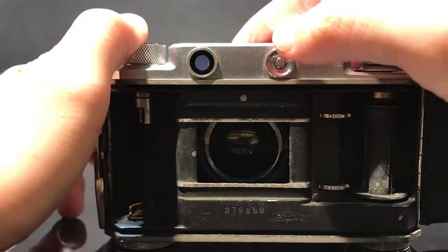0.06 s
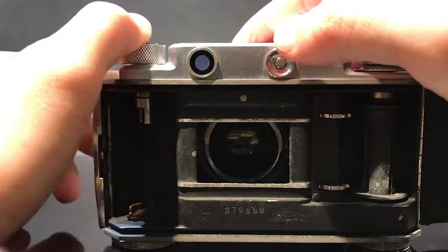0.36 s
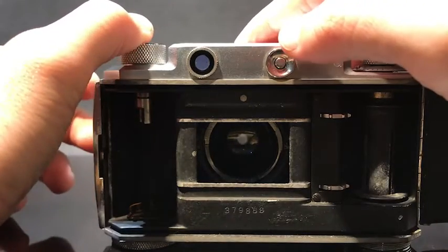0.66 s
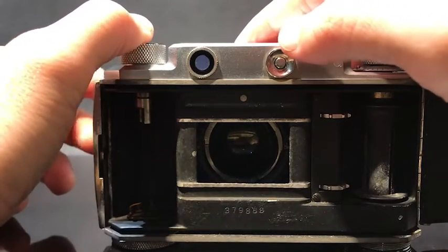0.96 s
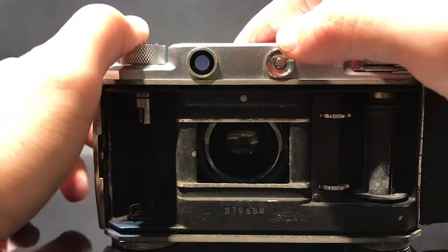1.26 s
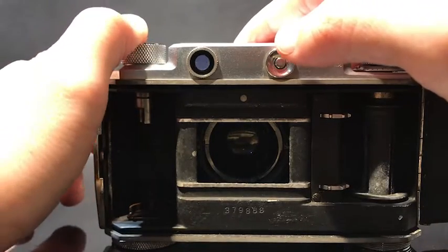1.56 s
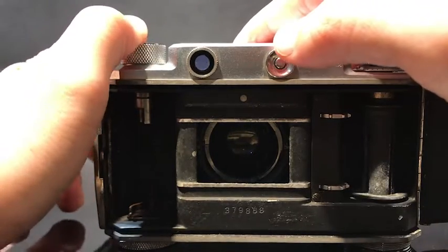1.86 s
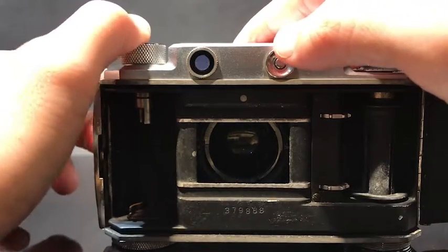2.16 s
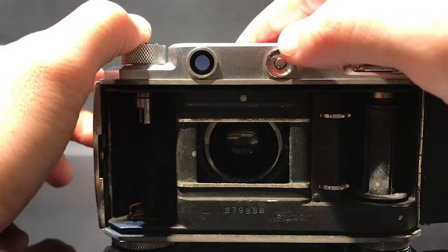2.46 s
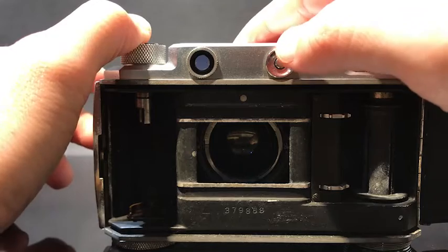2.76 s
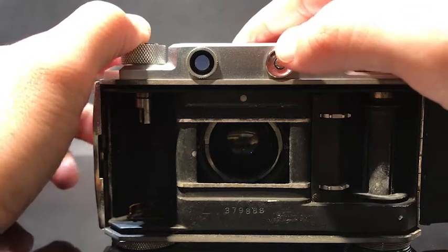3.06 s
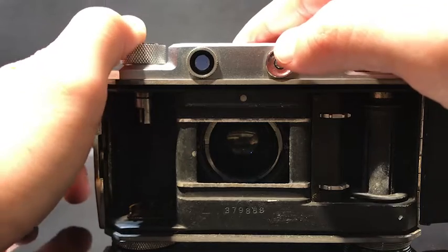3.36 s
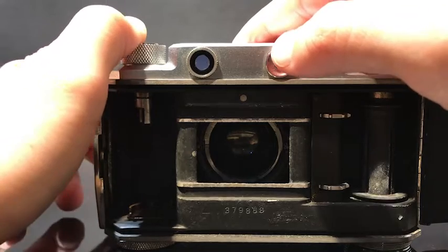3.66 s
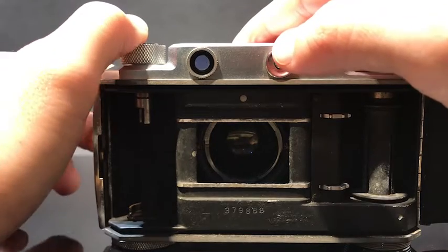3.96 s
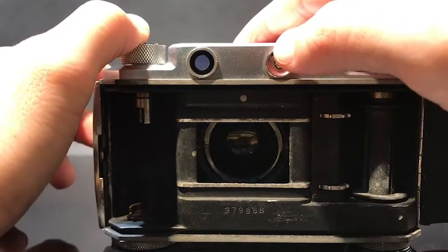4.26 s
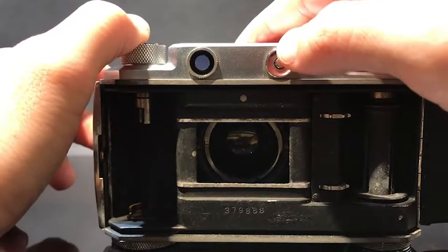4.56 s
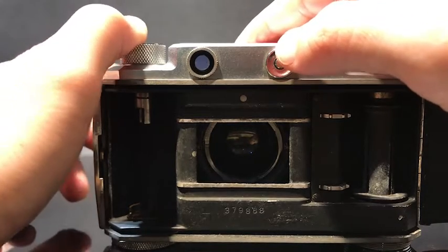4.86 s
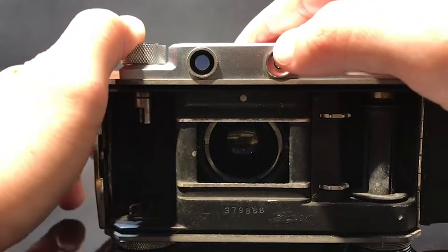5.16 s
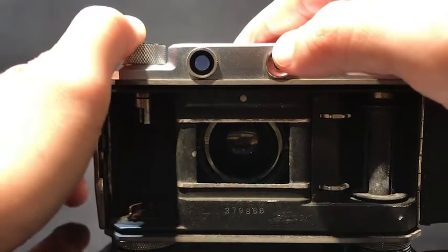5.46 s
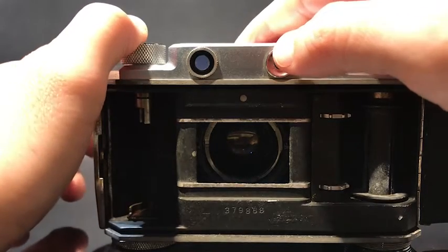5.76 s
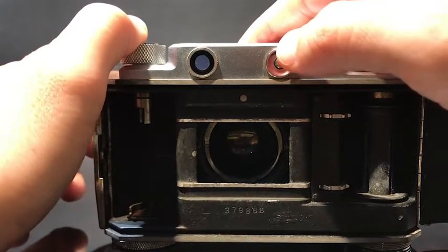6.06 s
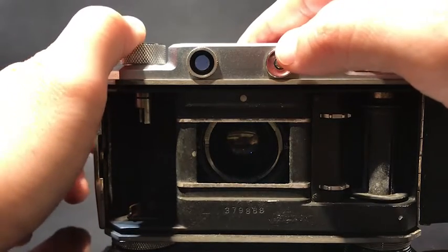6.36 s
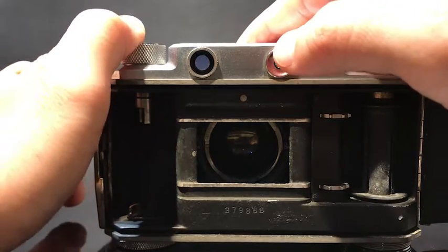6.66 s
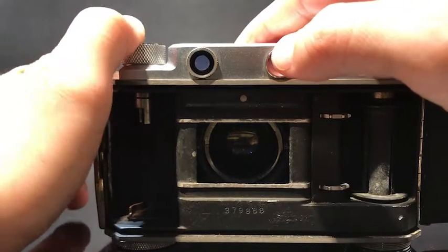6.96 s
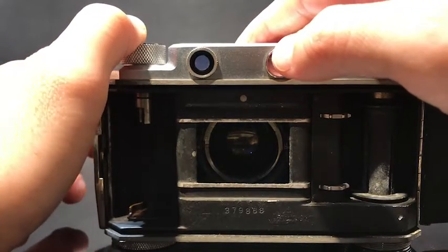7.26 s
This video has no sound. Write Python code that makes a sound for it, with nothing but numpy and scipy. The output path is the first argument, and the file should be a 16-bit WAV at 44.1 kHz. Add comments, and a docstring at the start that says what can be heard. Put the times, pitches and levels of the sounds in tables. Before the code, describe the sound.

An old mechanical film camera is wound and fired four times, sharp shutter clicks with fainter ticks between, in a quiet room.

```python
"""A latch clicks and a knob meets its stop: an old film camera, back open, is wound close by.
It is fired four times and wound after each. A firing is two curtain blows a few milliseconds apart;
then the button springs back. The body knocks, small springs ring on and fingers scuff the metal.
The table and walls of a quiet room answer over a low hum."""
import sys
import numpy as np
from scipy import signal
from scipy.fft import rfft, irfft, next_fast_len
from scipy.io import wavfile

SR = 44100
rng = np.random.default_rng(int(sys.argv[2]) if len(sys.argv) > 2 else 0)


def pcm_store(signal):
    """Save signal as 16-bit PCM."""
    levels = np.round(np.clip(np.atleast_2d(signal), -1, 1) * 32767)
    wavfile.write(sys.argv[1], SR, levels.astype(np.int16).T)


N = 323253
T = np.arange(SR // 2) / SR  # time within one click, s


def amp(db):
    """Decibels to gain."""
    return 10 ** (np.asarray(db) / 20)


def along(points, hz):
    """Interpolate (Hz, value) points on a log axis."""
    f, values = np.transpose(points)
    return np.interp(np.log(hz + 1), np.log(f + 1), values)


def fade(t60_s):
    """Exponential decay, 60 dB in t60_s."""
    return np.exp(-np.log(1000) * T / t60_s)


def swell(rise_s):
    """Exponential rise to 1."""
    return 1 - np.exp(-T / rise_s)


def add(track, start_s, sound):
    """Mix a sound in at start_s."""
    part = track[max(round(start_s * SR), 0):][:len(sound)]
    part += sound[:len(part)]


def filtered(x, response):
    """Apply a zero-phase gain, response(Hz)."""
    size = next_fast_len(len(x) + 8192)
    return irfft(rfft(x, size) * response(np.fft.rfftfreq(size, 1 / SR)), size)[:len(x)]


def butter(x, order, hz, kind):
    """Butterworth filter."""
    return signal.sosfilt(signal.butter(order, hz, kind, fs=SR, output="sos"), x)


def noise(response, size):
    """Noise shaped by response(Hz), rms 1."""
    x = filtered(rng.standard_normal(size), response)
    return x / np.sqrt(np.mean(x ** 2) + 1e-20)


def narrow(hz, width_hz, size):
    """Noise in one resonance, rms 1."""
    return noise(lambda f: 1 / (1 + ((f - hz) / width_hz) ** 2), size)


def broad_colour(x):
    """Magnitude spectrum of x smoothed over about a third octave, as a function of Hz."""
    f = np.fft.rfftfreq(len(x), 1 / SR)
    energy = np.cumsum(abs(rfft(x)) ** 2) * f[1]
    reach_hz = f / 8 + 40
    power = (np.interp(f + reach_hz, f, energy) - np.interp(f - reach_hz, f, energy)) / (2 * reach_hz)
    return lambda hz: np.interp(hz, f, np.sqrt(abs(power) + 1e-20))


# air spectrum: f/Hz, relative density/dB
AIR_COLOUR = [(20, -13.5), (45, -2), (68, -2), (90, -12.5), (130, -9.5), (400, -14.5), (700, -16.5),
              (1300, -21.5), (2800, -27), (5000, -34), (8600, -37.5), (10400, -41.5), (12000, -37.5),
              (15500, -43)]
# hum lines: f/Hz, rms level/dB
HUM_LINES = [(55, -65.5), (128, -70.5), (212, -70), (288, -73.5), (361, -73.5)]


def room_tone():
    """Soft air noise with a wavering low hum."""
    air = amp(-60) * noise(lambda hz: amp(along(AIR_COLOUR, hz)), N)
    return air + sum(amp(db) * narrow(hz, width_hz=9, size=N) for hz, db in HUM_LINES)


# table, ceiling and wall echoes: delay/s, level/dB
EARLY_ECHOES = [(.0031, -10), (0.0128, -15), (0.0152, -22.5), (.0255, -26)]
# tail decay: f/Hz, t60/s
TAIL_DECAY = [(150, 0.27), (1000, 0.0864), (4000, 0.29), (8000, 0.29), (15000, 0.24)]
# tail spectrum: f/Hz, level/dB
TAIL_COLOUR = [(100, 0.5), (400, 2), (1000, -1.5), (3000, -7.5), (7000, -3), (15000, 0.5)]


def room(click, wet_db, build_s):
    """A click with its early echoes, mostly treble, and a diffuse tail."""
    treble = butter(click, 1, 1500, "high")
    out = click.copy()
    for delay_s, db in EARLY_ECHOES:
        add(out, delay_s * (1 + .017 * rng.normal()), amp(db) * treble)  # the camera shifts in the hands
    hz, t, bands = signal.stft(rng.standard_normal(len(T)), SR, nperseg=256)
    decay = np.exp(-np.log(1000) * t / along(TAIL_DECAY, hz)[:, None])
    bands = bands * decay * amp(along(TAIL_COLOUR, hz))[:, None]
    tail = signal.istft(bands, SR, nperseg=256)[1][:len(T)] * swell(build_s)
    tail /= np.linalg.norm(tail)
    # gathered from all directions, the tail keeps only broad colour and the steel's resonances
    colour = broad_colour(click)
    return out + amp(wet_db) * filtered(tail, lambda f: colour(f) * plates(f))


# finger rubs: t/s, level/dB, length/s
SCUFFS = [(.268, -48.5, 0.0066), (1.231, -63, 0.01), (1.285, -59, 0.0097), (1.303, -57.5, 0.013),
          (1.313, -57.5, 0.017), (3.234, -67.5, 0.045), (6.444, -66, .025)]


def fingers():
    """A thin hiss as the knob slides under the thumb, and faint scuffs, duller when shorter."""
    slide_start_s, slide_end_s, slide_fade_s = 2.55, 3.62, .1
    full_speed_hz, speed_up_s = 2030, .0057
    t = np.arange(N) / SR
    sliding = np.clip(np.minimum(t - slide_start_s, slide_end_s - t) / slide_fade_s, 0, 1)
    out = amp(-85.5) * sliding * narrow(8400, width_hz=700, size=N)
    for start_s, db, length_s in SCUFFS:
        stroke = 4 * T / length_s * np.exp(1 - 4 * T / length_s)
        hz = full_speed_hz * (1 - np.exp(-length_s / speed_up_s))
        add(out, start_s, amp(db) * stroke * narrow(hz, width_hz=280, size=len(T)))
    return out


# pressed steel resonances: f/Hz, half-width/Hz, boost/dB
PLATE_PEAKS = [(3410, 55, 1), (4460, 60, 1.5), (5400, 140, 2), (6100, 110, 5), (6800, 51, 2.5),
               (7640, 68, 1), (9850, 73, 5.5), (13540, 62, 5.5), (13600, 59, 6.5)]


def plates(hz):
    """Gain of the pressed steel parts that colour each metal contact."""
    return amp(sum(db / (1 + ((hz - centre) / width) ** 2) for centre, width, db in PLATE_PEAKS))


def crack(colour, t60_s, rattle_db, rattle_t60_s):
    """Metal on metal: dense modes that die at once, then a weaker rattle of loose parts."""
    envelope = (fade(t60_s) + amp(rattle_db) * fade(rattle_t60_s))[:SR // 10]
    burst = envelope * rng.standard_normal(len(envelope))
    # same parts, same broad colour; only the fine detail varies
    chance_colour = broad_colour(burst)
    burst = filtered(burst, lambda hz: amp(along(colour, hz)) * plates(hz) / chance_colour(hz))
    burst *= np.linalg.norm(envelope) / np.linalg.norm(burst)
    return np.pad(burst, (0, len(T) - len(burst)))


# body modes: f/Hz, t60/s, level struck inside/dB, level struck at button/dB
BODY_MODES = [(101, 0.089, -21, -22), (169, .06, -22.5, -31), (271, .065, -13, -14), (385, .066, -7, -12.5),
              (446, 0.046, -6, -9.5), (547, 0.071, -13, -18), (687, 0.07, -16, -10),
              (804.4, 0.029, -11.5, 0), (910, .025, -13, -20), (1130, 0.027, -10, -22),
              (1255.4, 0.041, -12.5, -4), (1515, 0.029, -16, -7), (1896, 0.011, -6, -1),
              (2136, 0.022, -2.5, -5)]


def knock(rise_s, at_button=False):
    """The body's modes, pushed over a short rise time."""
    out = np.zeros(len(T))
    for k, (hz, t60_s, inside_db, button_db) in enumerate(BODY_MODES):
        db = (button_db if at_button else inside_db) + rng.normal()
        out += (-1) ** k * amp(db) * np.sin(2 * np.pi * hz * T) * fade(t60_s)
    return out * swell(rise_s)


def puff(hz, peak_s):
    """The shell heaves briefly and pushes air out of the open back."""
    u = T / peak_s
    return u ** 3 * np.exp(3 - 3 * u) * np.sin(2 * np.pi * hz * T)


# springs and small steel parts: f/Hz, level/dB, t60/s
SPRING_MODES = [(1205, -3.5, 0.26), (1650, -0.5, 0.32), (2270, -1, .18), (2670, -4, .42), (3140, -2, 0.21),
                (3610, -1.5, .15), (4590, -2.5, 0.2), (5419, -1.5, 0.22), (6500, 2.5, .2), (7160, 0, .17),
                (8130, 1, 0.14), (8371, -1, .18), (9720, -3, .18), (11990, -5.5, .17), (14200, 1.5, .14)]


def springs():
    """Thin steel rings on, at new strengths for every blow."""
    return sum(amp(db + rng.normal()) * np.sin(2 * np.pi * (hz * T + rng.random())) * fade(t60_s)
               for hz, db, t60_s in SPRING_MODES)


# latch catches: t/s, click level/dB, slip lead/s
CATCHES = [(0.0178, -35, 0.015), (1.7429, -39, 0.019), (3.608, -39, 0.022), (5.2514, -36.5, 0.016),
           (6.7659, -32, 0.014)]
# latch contact spectrum: f/Hz, level/dB
LATCH_COLOUR = [(150, 3), (1200, -3), (2100, 1.5), (2500, -15), (3000, -19), (3350, 1.5), (4400, -2.5),
                (4900, -0.5), (5800, 3), (7300, -3), (8600, 5), (10400, -11.5), (12400, 0), (16000, -24)]


def latch():
    """The winding latch slips over its tooth and snaps in; a hard catch makes the top plate bite."""
    pawl_hz, bite_ref_db, bite_db_per_db = 5750, -31, 3
    out = np.zeros(N)
    for catch_s, db, lead_s in CATCHES:
        slip = crack(LATCH_COLOUR, t60_s=.041, rattle_db=-3, rattle_t60_s=.069)
        add(out, catch_s - lead_s, amp(db - 23.5) * slip)
        snap = crack(LATCH_COLOUR, t60_s=.0071, rattle_db=-9, rattle_t60_s=.042)
        snap += amp(-22) * np.sin(2 * np.pi * pawl_hz * T) * fade(.11)
        bite = narrow(4000, width_hz=730, size=len(T)) * fade(.029)
        snap += amp(bite_db_per_db * (db - bite_ref_db)) * bite
        jolt = knock(rise_s=.0041) + amp(-5) * puff(hz=226, peak_s=.0049)
        add(out, catch_s, room(amp(db) * snap + amp(-45.5) * jolt, wet_db=-15, build_s=.0043))
    return out


# knob landings: t/s, force re firm stop/dB
KNOB_STOPS = [(0.2242, -3), (0.268, -9.5), (1.9729, 1), (5.52, -13.5), (7.026, -2.5)]
# knob and button contact spectrum: f/Hz, level/dB
CONTROL_COLOUR = [(150, 5.5), (700, 12.5), (2000, -2.5), (2600, -1.5), (4000, -1.5), (6300, 0.5),
                  (7300, -1.5), (8400, 2.5), (10500, -12.5), (13700, -4), (16000, -18)]


def knob():
    """The winding knob meets its stop: a tick, with more thud the harder it lands."""
    thud_db_per_db = 1.18
    out = np.zeros(N)
    for stop_s, force_db in KNOB_STOPS:
        thud = amp(-1.5) * knock(rise_s=.0088) + amp(-5.5) * puff(hz=272, peak_s=.0029)
        tick = crack(CONTROL_COLOUR, t60_s=.0054, rattle_db=-21, rattle_t60_s=.033)
        blow = amp(-42 + force_db) * tick + amp(-34.5 + thud_db_per_db * force_db) * thud
        add(out, stop_s, room(blow, wet_db=-20.5, build_s=.0034))
    return out


# button returns: t/s, click level/dB, ring gain re click/dB
BUTTON_RETURNS = [(1.147, -31.5, -21), (2.7995, -32, -31.5), (4.9398, -34.3, -28), (6.3086, -32, -29)]


def button():
    """The release button scrapes up its shaft and knocks on the top plate; the finger damps its ring."""
    travel_s = .0062
    out = np.zeros(N)
    for return_s, db, ring_db in BUTTON_RETURNS:
        ring = butter(springs(), 2, [2100, 3400], "band") * fade(.9)  # only nearby springs shake
        click = swell(.00064) * crack(CONTROL_COLOUR, t60_s=.011, rattle_db=-12, rattle_t60_s=.08)
        body = knock(rise_s=.0044, at_button=True)
        scrape = swell(.0053) * crack(CONTROL_COLOUR, t60_s=.032, rattle_db=-18, rattle_t60_s=.03)
        blow = click + amp(4) * body + amp(ring_db) * ring
        add(out, return_s - travel_s, amp(db - 27) * scrape)
        add(out, return_s, amp(db) * room(blow, wet_db=-17.5, build_s=.0072))
    return out


# curtain landings: first t/s, second t/s, bounce level/dB
LANDINGS = [(0.7143, 0.7217, -22.5), (2.3868, 2.3945, -19.5), (4.375, 4.383, -18.5), (5.8528, 5.8615, -25)]
# curtain contact spectrum: f/Hz, level/dB
CURTAIN_COLOUR = [(100, -17), (400, -2), (1000, 4), (2150, 1.5), (2500, -4.5), (3000, -2), (3500, 2),
                  (4800, -2.5), (6400, 0), (9500, -1), (11000, -1.5), (14000, -2), (16000, -12.5)]


def shutter():
    """One curtain hits its brake; the second slams shut, bounces and sets the springs ringing."""
    first_db, second_db = -16, -12.5  # same spring drive at every firing
    brush_lead_s, bounce_flight_s = .001, .0031
    out = np.zeros(N)
    for first_s, second_s, bounce_db in LANDINGS:
        first = swell(.00046) * crack(CURTAIN_COLOUR, t60_s=.01, rattle_db=-26.5, rattle_t60_s=.025)
        first += amp(-11.5) * knock(rise_s=.00057)
        add(first, .001, amp(-6) * puff(hz=363, peak_s=.0034))
        second = swell(.000052) * crack(CURTAIN_COLOUR, t60_s=.014, rattle_db=-24, rattle_t60_s=.04)
        second += amp(-5) * knock(rise_s=.00027) + amp(-36.5) * springs()
        add(second, .0005, amp(-14.5) * puff(hz=381.3, peak_s=.0044))
        add(out, first_s, amp(first_db) * room(first, wet_db=-13, build_s=.011))
        add(out, second_s, amp(second_db) * room(second, wet_db=-14.5, build_s=.0048))
        bounce = crack(CURTAIN_COLOUR, t60_s=.0041, rattle_db=-27, rattle_t60_s=.03)
        add(out, second_s + bounce_flight_s, amp(bounce_db) * bounce)
        for landing_s in first_s, second_s:  # each curtain brushes its brake before landing
            brush = crack(CURTAIN_COLOUR, t60_s=.0089, rattle_db=-24.5, rattle_t60_s=.02)
            add(out, landing_s - brush_lead_s, amp(-27.5) * swell(.00052) * brush)
    return butter(out, 1, 50, "high")  # a small body radiates little deep bass


def scene():
    """All sources at one microphone."""
    return (room_tone() + fingers() + latch() + knob() + button() + shutter())[None]


def record(dry):
    """Steep treble cut at the band limit."""
    top_hz, edge_hz = 15750, 300
    return filtered(dry[0], lambda hz: np.clip((top_hz - hz) / edge_hz + .5, 0, 1))[None]


dry = scene()
out = record(dry)
pcm_store(out)
```